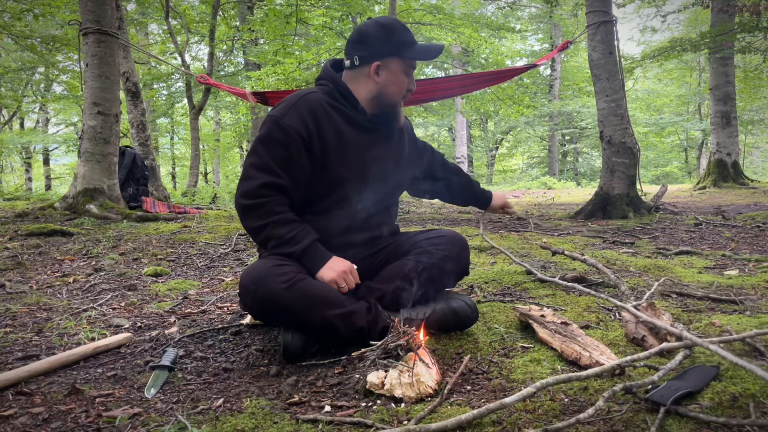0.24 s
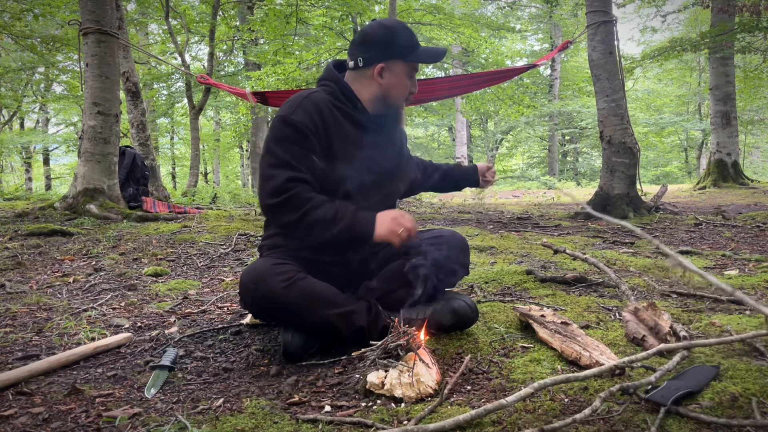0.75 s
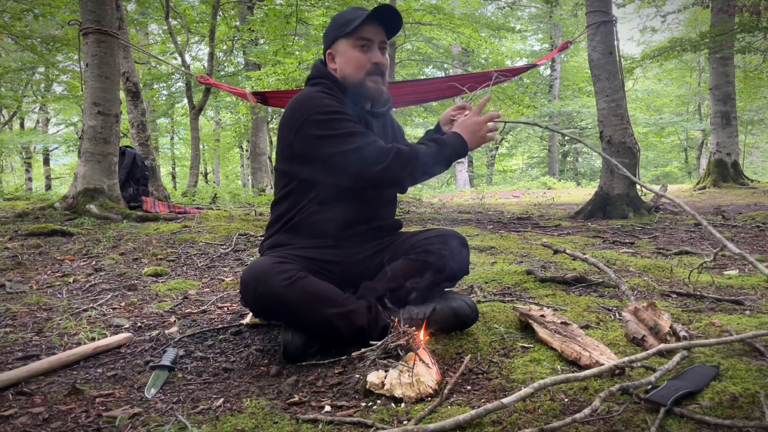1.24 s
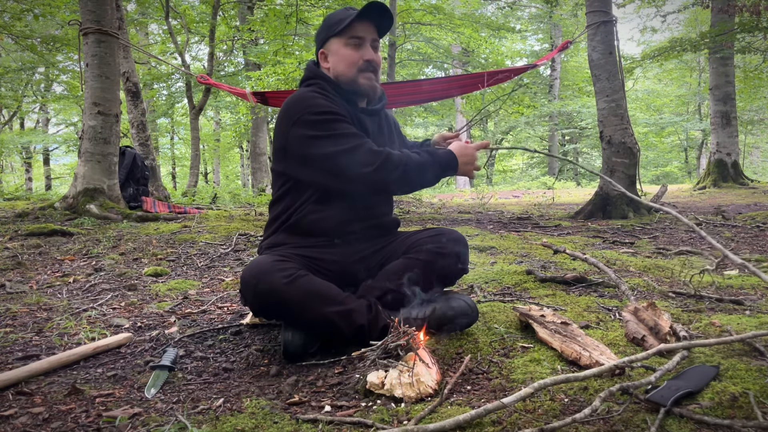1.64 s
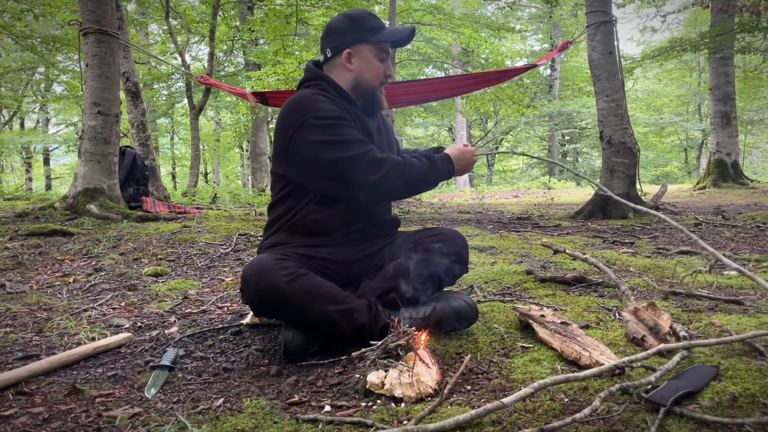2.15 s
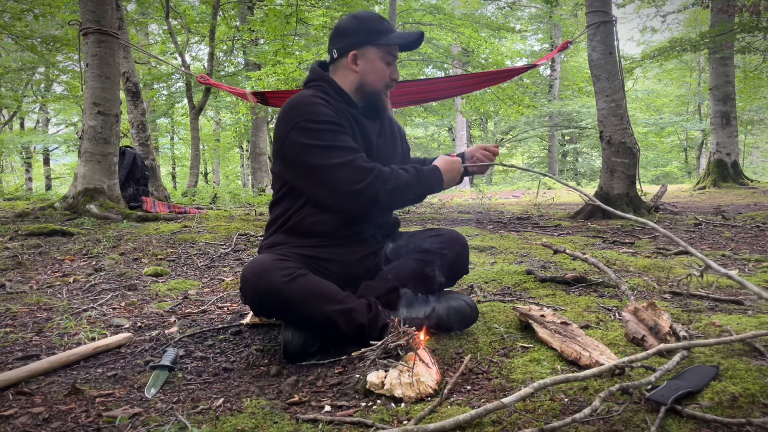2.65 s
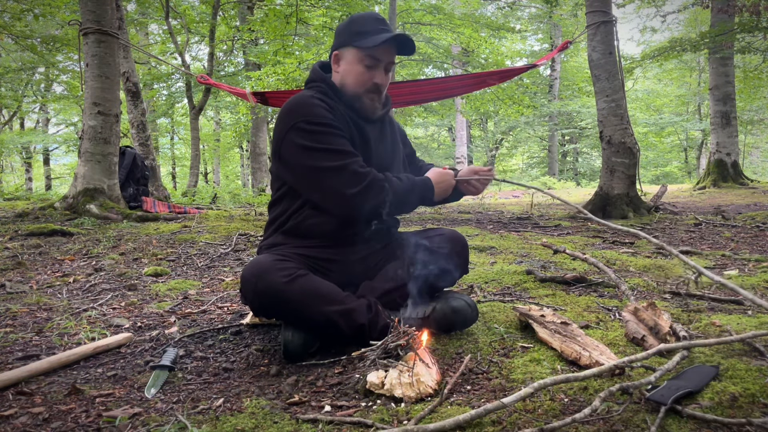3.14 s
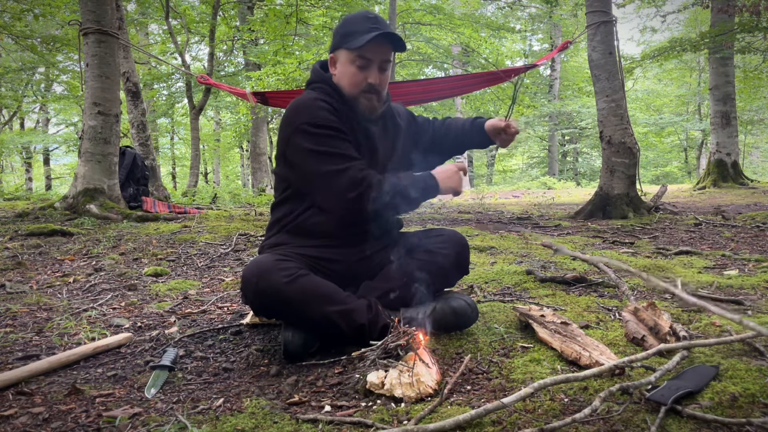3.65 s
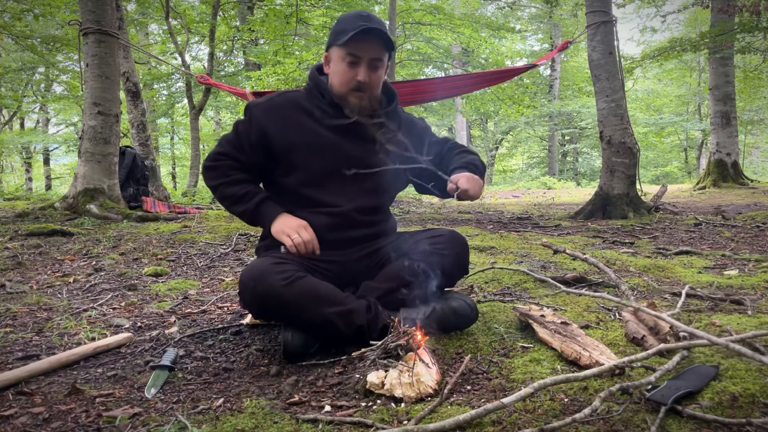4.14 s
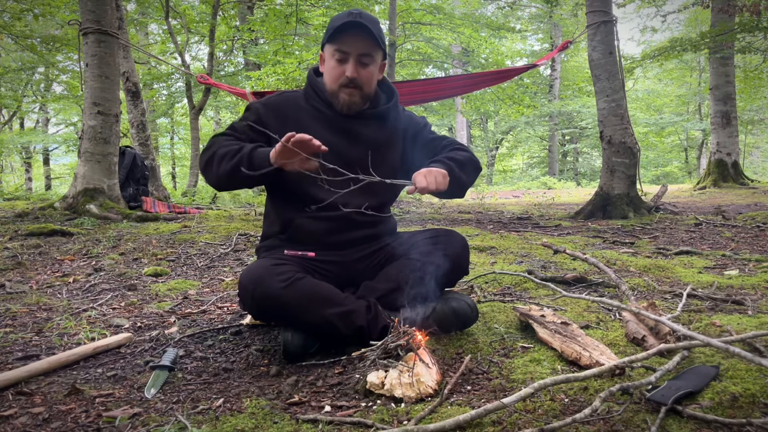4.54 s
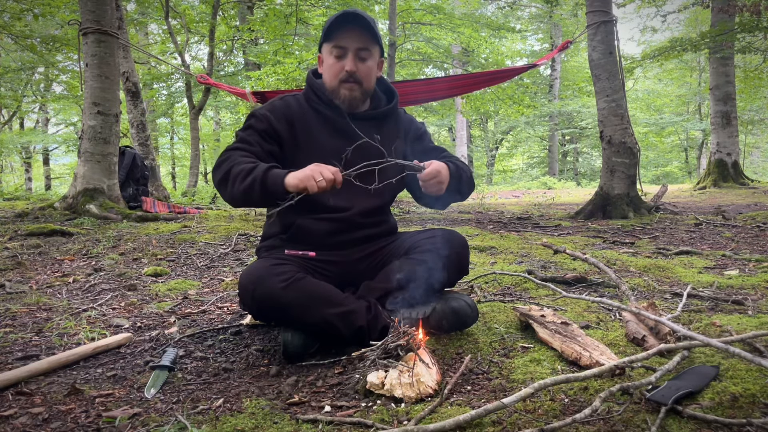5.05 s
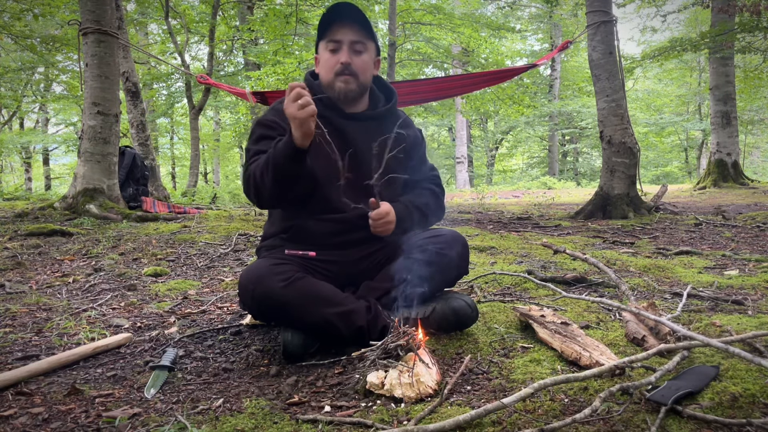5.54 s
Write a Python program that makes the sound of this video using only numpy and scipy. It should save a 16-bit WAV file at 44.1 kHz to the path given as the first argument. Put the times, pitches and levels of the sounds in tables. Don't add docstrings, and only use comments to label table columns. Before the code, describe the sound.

One very loud bright twig crack, then several smaller snaps, dry rustling and scraping between them, over a faint airy woodland hush.

```python
import sys
import numpy as np
from scipy import signal
from scipy.fft import rfft, irfft, next_fast_len
from scipy.io import wavfile
from scipy.ndimage import uniform_filter1d

SR = 44100
rng = np.random.default_rng(int(sys.argv[2]) if len(sys.argv) > 2 else 0)


def persist_wave(psi):
    counts = np.round(np.clip(psi, -1, 1) * 32767).astype(np.int16)
    wavfile.write(sys.argv[1], SR, np.atleast_2d(counts).T)


def linear_from_db(decibels):
    return 10 ** (np.asarray(decibels, float) / 20)


N = 255339
M = next_fast_len(N)
HZ = np.fft.rfftfreq(M, 1 / SR)

# start in seconds, ring peak in dB, ring pitch in Hz, splinter peak in dB, fade in ms.
SNAP_BURSTS = [(.0880, -24, 4300, -17, 1.02), (.0894, -25.5, 6167, -11.5, 1.472),
               (.0907, -18.5, 6153, -8.5, 0.5163), (.0921, -25, 2629, -19, 0.7197),
               (1.4500, -35.5, 3061, -13.5, 1.5985), (1.4511, -29, 6492, -21, 0.8273),
               (1.4522, -29, 2390, -17, 0.6493), (1.4534, -28.5, 2435, -22.5, 1.11),
               (2.2560, -46, 2050, -28, 1.2297), (2.2574, -40.5, 2278, -25, .55),
               (3.1390, -44.5, 2086, -27, 0.9434), (3.1426, -46, 2482, -24.5, 1.3485),
               (3.1441, -41.5, 2095, -19, 0.5432), (3.1468, -36, 2043, -22.5, 0.8944),
               (3.1606, -46.5, 2070, -34, 0.8713), (3.1884, -47, 2198, -36, 1.1476),
               (5.3150, -65.5, 2600, -50, 0.9021), (5.3263, -30, 2460, -18.5, 0.6837),
               (5.3276, -31, 4322, -17.5, 0.501), (5.3296, -34, 4280, -18, .4),
               (5.3307, -34, 2481, -20.5, 0.7145), (5.3340, -36.5, 2375, -27, 1.121)]
# start in seconds, peak in dB, pitch in Hz, t60 in ms.
FREE_RINGS = [(.0885, -17.5, 4347, 8.69), (0.0897, -18, 5561, 8.434), (.0900, -17, 6416, 10),
              (.0908, -17, 7270, 7.53), (.0916, -26, 2618, 21.62), (.0912, -8, 11000, 2.727),
              (.0913, -10, 7700, 2.336), (.0888, -26, 7337, 5.56), (0.091, -15, 14200, 3.5),
              (1.4507, -25.5, 6260, 10.06), (1.4524, -28, 2384, 13.515), (1.4512, -31, 3607, 5.915),
              (1.453, -26, 8300, 5.7), (1.4503, -26, 11000, 8), (1.4524, -22, 11500, 5),
              (1.4582, -40, 6208, 10), (3.1440, -24.5, 7898, 4), (3.1442, -19, 12300, 4),
              (3.1470, -27, 13000, 4), (3.1897, -46.5, 2100, 18.341), (5.0273, -59, 2540, 18.92),
              (5.3264, -25, 2468, 11.914), (5.3268, -27, 6488, 7.55), (5.3263, -25, 13000, 5),
              (5.3300, -29, 2453, 9.7), (5.3305, -32, 4309, 9.67), (5.3348, -34, 2385, 10.496)]
# start in seconds, peak in dB, pitch in Hz, fade in ms.
THICK_END_KNOCKS = [(.09, -49.5, 340.5, 11), (.091, -30, 1700, 2.0), (.584, -48, 800, 3.42),
                    (.392, -54.5, 911.6, 3.954), (.445, -59, 701.3, 6.256), (1.976, -59.5, 260, 9.17),
                    (2.028, -58, 240, 8.97), (2.06, -56.5, 599, 6.844), (2.095, -54.5, 443.8, 9.6),
                    (2.12, -55.5, 698.5, 6.66), (2.138, -54.5, 945.3, 7.79), (2.16, -58.5, 498, 8),
                    (2.345, -57.5, 400, 6.598), (1.452, -51.5, 363.6, 6.956), (1.545, -58, 300.6, 7.313),
                    (2.257, -42.5, 1438, 1.505), (2.265, -40, 1218, 2.622), (2.262, -45, 289.9, 6.85),
                    (3.734, -63, 301.1, 3.6), (5.326, -42, 1240, 5.305), (5.327, -57, 379.6, 8.155)]
# start in seconds, ring peak in dB, ring pitch in Hz.
TWIG_TICKS = [(0.045, -49, 3677), (.3655, -48, 4632), (.399, -45.5, 3977), (.5567, -43, 5230),
              (0.6026, -38, 6590), (0.6169, -40.5, 3694), (0.7783, -53.5, 6814), (.8764, -56.5, 3803),
              (0.8988, -43.5, 4725), (0.9115, -48, 2980), (.9617, -47, 3480), (0.9996, -52, 2318),
              (1.1581, -57, 2730), (1.1824, -51.5, 3127), (1.2132, -59, 4520), (1.4057, -56.5, 4409),
              (1.617, -49, 3100), (1.8, -59.5, 1820), (2.137, -42.5, 3226), (2.3672, -63, 4714),
              (2.5394, -64.5, 4620), (2.9773, -60.5, 1930), (3.2647, -50.5, 5624), (.313, -57, 4610),
              (3.179, -51, 4500), (3.215, -57, 2100), (3.275, -53, 4800), (3.238, -56, 2100),
              (1.128, -58, 4800), (3.3993, -59, 3570), (3.438, -54, 6910), (3.512, -46, 4750),
              (3.5914, -49, 4939), (3.7339, -39, 5900), (3.7781, -44.5, 5050), (3.8367, -53, 4820)]
# start in seconds, ring peak in dB, ring pitch in Hz.
BARK_SCRATCHES = [(.0024, -40.5, 3889), (0.204, -51, 6310), (.229, -48.5, 4838), (0.5159, -52.5, 4776),
                  (0.5849, -50, 2449), (2.0611, -40.5, 3268), (2.1554, -50, 2762), (2.2095, -56, 2569),
                  (2.2265, -55, 6853), (2.2788, -40, 2983), (2.349, -56.5, 4145), (2.9174, -48, 5027),
                  (2.9295, -50, 3431), (3.457, -64, 1787), (3.5656, -42.5, 4945), (3.653, -55.5, 5058),
                  (3.819, -56.5, 4600), (3.9241, -55, 5380), (3.996, -66, 4983), (4.559, -67, 4800),
                  (4.6696, -68, 3400), (4.7042, -63, 5960), (4.82, -64, 3300), (5.0262, -61, 4995),
                  (5.141, -67.5, 2547), (5.2112, -69, 2400), (5.2814, -70.5, 2294), (5.424, -50, 11000),
                  (5.4499, -48, 4890)]
# start in seconds, ring peak in dB, ring pitch in Hz, fade in ms.
BARK_RASPS = [(0.3808, -49, 5120, 4.197), (.392, -51, 2969, 4.225), (.6082, -43, 4830, 3.714),
              (.643, -55, 4997, 4), (.8292, -56, 3850, 5.872), (1.1735, -56, 2993, 5),
              (1.9728, -58, 3289, 5), (1.9925, -58, 3382, 4.5), (2.0145, -52, 3730, 5.087),
              (2.034, -45, 3036, 8.475), (2.0817, -42.5, 3520, 3.055), (2.086, -44, 4500, 5.718),
              (2.104, -49.5, 2808, 6.08), (2.1186, -46.5, 2946, 4.394), (3.4827, -58, 4782, 3.496),
              (3.497, -54, 4900, 7.42), (3.544, -52, 4780, 4.522), (3.586, -51.5, 4900, 5.67),
              (3.66, -57, 5628, 4.933), (3.6795, -55, 6168, 8), (3.72, -54, 6604, 5.106),
              (3.742, -46.5, 2382, 4.17), (3.759, -50, 4500, 3.835), (3.857, -54.5, 5016, 7.7),
              (3.878, -52, 5207, 5), (4.703, -64, 3802, 3.962)]
# start in seconds, peak in dB.
BARK_FLECKS = [(0.391, -49), (0.4104, -54), (0.4653, -53), (0.5344, -53.5), (0.5829, -50), (0.5914, -41.5),
               (0.6098, -48), (0.6263, -47.5), (0.8995, -46.5), (0.9114, -51), (0.9383, -55),
               (0.9627, -55.5), (0.9996, -64), (1.9649, -61), (2.0148, -55.5), (2.1829, -53.5),
               (2.3378, -49), (2.354, -54.5), (2.3674, -63), (2.5094, -67), (2.9184, -46), (2.9291, -45),
               (2.9773, -60), (3.1604, -37), (3.1877, -38), (3.242, -53), (3.4491, -59), (3.4572, -55.5),
               (3.8187, -51.5), (3.8438, -57), (3.925, -54), (3.9364, -62), (4.559, -60), (4.6544, -77),
               (4.6693, -64), (4.7114, -66), (4.7241, -72), (4.8265, -56.5), (5.0227, -58), (5.0347, -52),
               (5.109, -74), (5.1394, -73), (5.2826, -68)]
# frequency in Hz, level in dB.
SPLINTER_COLOUR = [(1000, -34), (3300, -13), (4200, -6), (6400, 0), (9000, -3.5), (12000, -2),
                   (15500, -6.5), (17000, -13)]
# centre in Hz, width in octaves, level in dB, t60 in s.
TRUNK_BANDS = [(400, .4, -2.5, .4), (1118.8, 0.6, 0, 0.46), (2600, 0.16, -3.5, 0.62),
               (2460, 0.37, -5, 0.55), (5450, 0.67, 2.5, 0.54), (9080, 0.3, 1, 0.38), (12500, .25, 1, 0.35)]
# delay in seconds, level in dB.
TRUNK_ECHOES = [(.018, -34), (.026, -30), (.046, -33), (.075, -36), (0.113, -39), (.138, -41),
                (.165, -47.5)]
# hardest moment in seconds, leaf level in dB,
# seconds to swell 20 dB, seconds to die 20 dB, leaf pitch in Hz.
LITTER_STROKES = [(.001, -60, 0.0258, 0.063, 3958), (0.387, -58.5, 0.0066, 0.3478, 4110),
                  (.57, -62.5, 0.2222, 0.1891, 4903), (.605, -52, 0.0596, 0.0995, 4584),
                  (.78, -72.5, 0.3338, 0.4304, 4000), (0.908, -64, 0.5866, 0.1843, 3680),
                  (1.176, -67, -0.0466, 0.1206, 3220), (1.796, -80, 0.1612, 0.0879, 3169),
                  (1.975, -68.5, 0.0416, 0.1977, 3300), (2.04, -59, 0.0654, 0.1966, 3200),
                  (2.087, -54, 0.0851, 0.1476, 3601), (2.139, -54.5, 0.0795, 0.1159, 3386),
                  (2.26, -54, 0.0359, 0.1583, 4631), (2.289, -57, 0.02, 0.0674, 2400),
                  (2.37, -69, 0.5574, 0.2266, 3898), (2.925, -62, 0, 0.1302, 4706),
                  (3.283, -68.5, 0.2147, 0.1587, 3962), (3.574, -68.5, 0.2504, 0.1008, 4857),
                  (3.67, -67.5, 0.0075, 0.313, 4958), (3.733, -55, -0.0021, 0.1154, 4608),
                  (3.51, -65.5, 0.0419, 0.1034, 4909), (3.8, -66, 0.1381, 0.3471, 4500),
                  (3.9, -69, 0.19, 0.2243, 2600), (4.0, -74, .2, .4, 9000), (3.19, -64, .03, .12, 3500),
                  (3.41, -73, .15, .1, 9000), (4.72, -82.5, 0.1793, 0.42, 9015),
                  (4.824, -73, 0, 0.1295, 2766), (5.026, -67, 0.0034, -0.0335, 2563),
                  (5.37, -53, 0.0001, 0.0916, 3220), (5.45, -59, 0.3, 0.04, 3783)]
# time in seconds,
# deep rumble level in dB.
DEEP_RUMBLE = [(0.0, -67), (1.01, -64.5), (1.06, -75), (1.24, -63.5), (1.29, -73.5), (1.48, -60),
               (1.61, -69.5), (2.24, -62), (2.3, -47), (2.35, -62.5), (2.82, -76), (3.19, -64),
               (3.37, -70.5), (3.55, -59.5), (3.69, -67.5), (3.79, -56), (4.0, -74), (5.79, -70)]
# frequency in Hz, level in dB per Hz.
RUMBLE_COLOUR = [(15, -50), (25, -20), (40, -6.5), (54, -1), (71, 2.5), (102, -5.5), (135, 0.5),
                 (149, -0.5), (184, -9.5), (238, -11.5), (365, -24), (420, -25), (550, -53.5), (920, -120)]
# frequency in Hz, level in dB per Hz.
HUSH_COLOUR = [(180, -31.5), (300, -4), (915, -17.5), (1720, -18.5), (2440, -23), (4910, -26.5),
               (7080, -30), (8500, -45.5), (9550, -32), (12500, -32.5), (16000, -44.5)]
# frequency in Hz, left minus right in dB, radians by which left leads
PORT_PAIR = [(30, 1.3, 0, 0, .97), (150, 2.4, 0, 0, .85), (600, .7, .1, .1, .2), (2000, .3, .2, .15, .4),
             (4200, 1.5, .7, .7, .3), (5700, 1.5, -1.2, -1.2, .5), (7300, .2, -2.0, -2.2, .8),
             (7900, .2, -2.7, -3.1, .995), (9100, .2, -3.8, -3.2, .995), (10000, 1.1, -4.6, -5.9, .99),
             (13200, 1.1, -7.5, -6.7, .99), (14600, 1.1, -8.9, -9.4, .95), (17000, 1.1, -10.5, -10.5, .9)]


def on_hz(table, column, hz):
    table = np.array(table)
    return np.interp(np.log(hz + 1), np.log(table[:, 0]), table[:, column])


def columns(table):
    return np.array(table).T[:, :, None]


def shape(x, gain):
    size = 2 * len(gain) - 2
    y = irfft(rfft(x, size) * gain, size)[:len(x)]
    return y / np.sqrt(np.mean(y ** 2))


def hump(hz, octaves, f=HZ):
    return np.exp(-.5 * (np.log2((f + 1) / hz) / octaves) ** 2)


def walk(rate):
    k = int(SR / rate)
    steps = np.repeat(rng.standard_normal(N // k + 1), k)
    return 1.2 * uniform_filter1d(uniform_filter1d(steps, k), k)[:N]


def place(grains, s):
    out = np.zeros(N + grains.shape[1])
    for grain, start in zip(grains, (s * SR).astype(int)):
        out[start:start + len(grain)] += grain
    return out[:N]


def resonance(f, hz, q):
    return 1j * f / hz / (1 - (f / hz) ** 2 + 1j * f / hz / q)


def splinter_response(f, tilt_db, size):
    colour_db = on_hz(SPLINTER_COLOUR, 1, f) + tilt_db * np.log2((f + 1) / 8000)
    cepstrum = irfft(np.log(linear_from_db(colour_db)))
    cepstrum[:, 1:size // 2] *= 2
    cepstrum[:, size // 2 + 1:] = 0
    return np.exp(rfft(cepstrum))


def breaks(s, peak_db, hz, splinter_db, fade_ms, tilt_db, ring_q, tear, spiky_db, thud_db, size=2048):
    ms = np.arange(size) * 1000 / SR
    f = np.fft.rfftfreq(size, 1 / SR)
    fade_ms = np.clip(fade_ms, .1, 8)
    effort = np.minimum(ms / (tear * fade_ms), np.exp(tear - ms / fade_ms))
    chance = rng.standard_normal((len(s), 2, size))
    fibres = rfft(effort * chance[:, 0] * linear_from_db(spiky_db * chance[:, 1]))
    ring = irfft(fibres * resonance(f, hz, ring_q) * 1j * f / (1j * f + 0.4 * hz))
    splinters = irfft(fibres * splinter_response(f, tilt_db + np.zeros_like(s), size))
    thud = irfft(fibres * resonance(f, 540, 0.71) / (1 + 1j * f / 900))
    parts = (ring, peak_db), (splinters, peak_db + splinter_db), (thud, peak_db + thud_db)
    return sum(linear_from_db(db) * g / np.abs(g).max(axis=1, keepdims=True) for g, db in parts)


def snaps():
    s, ring_db, hz, splinter_db, fade_ms = columns(SNAP_BURSTS)
    excess_db = splinter_db - ring_db
    tilt_db = 0.1928 - 0.0743 * excess_db
    return s, breaks(s, ring_db, hz, excess_db, fade_ms, tilt_db,
                     ring_q=8, tear=0.61, spiky_db=2.6, thud_db=-30.5)


def free_rings(size=2048):
    s, peak_db, hz, t60_ms = columns(FREE_RINGS)
    ms = np.arange(size) * 1000 / SR
    fade = linear_from_db(peak_db - 60 * ms / t60_ms) * (1 - np.exp(-ms / 0.22))
    start_phase = 2 * np.pi * rng.random(s.shape)
    return s, 1.4795 * fade * np.sin(2 * np.pi * hz * ms / 1000 + start_phase)


def knocks():
    s, peak_db, hz, fade_ms = columns(THICK_END_KNOCKS)
    return s, breaks(s, peak_db, hz, -41.5, fade_ms, tilt_db=0,
                     ring_q=1.8, tear=0.66, spiky_db=4.4, thud_db=-11)


def ticks():
    s, ring_db, hz = columns(TWIG_TICKS)
    return s, breaks(s, ring_db, hz, splinter_db=-13, fade_ms=3, tilt_db=0,
                     ring_q=4.4, tear=0.31, spiky_db=3.6, thud_db=-19.5)


def scratches():
    s, ring_db, hz = columns(BARK_SCRATCHES)
    return s, breaks(s, ring_db, hz, splinter_db=0, fade_ms=2.7, tilt_db=0,
                     ring_q=5.8, tear=0.32, spiky_db=3.3, thud_db=-20.5)


def rasps():
    s, ring_db, hz, fade_ms = columns(BARK_RASPS)
    return s, breaks(s, ring_db, hz, -7, fade_ms, tilt_db=0,
                     ring_q=4, tear=0.8228, spiky_db=3.5, thud_db=-18)


def flecks():
    s, peak_db = columns(BARK_FLECKS)
    return s, breaks(s, peak_db - 8, 4500, splinter_db=12, fade_ms=1.4325, tilt_db=1.7,
                     ring_q=0.81, tear=0.4, spiky_db=2, thud_db=-18)


def crackle(rate, spread_db, hiss):
    chance = rng.random((N, 2))
    grains = (chance[:, 0] < rate / SR) * linear_from_db(-spread_db * np.log(chance[:, 1] + 1e-9))
    smear = np.exp(-np.arange(200) / 10)
    envelope = signal.fftconvolve(grains, smear)[:N]
    return (envelope / np.sqrt(np.mean(envelope ** 2)) + hiss) * rng.standard_normal(N)


def dragging():
    t = np.arange(N) / SR
    s, top_db, swell_s, die_s, pitch_hz = columns(LITTER_STROKES)
    strokes_db = top_db - 20 * np.maximum((s - t) / np.abs(swell_s), (t - s) / np.abs(die_s))
    leaves_db = strokes_db.max(axis=0)
    hz = pitch_hz[strokes_db.argmax(axis=0), 0]
    harder_db = np.maximum(leaves_db, -90) + 70
    fine_db = -3 - 0.0661 * harder_db
    soil_db = -12 - 0.2776 * harder_db
    push = linear_from_db(leaves_db + 1.5 * walk(50))
    shared = crackle(500, 2.8, .7)

    def band(centre_hz, octaves):
        grains = push * (shared + 0.32 * crackle(280, 2.61, 0.2))
        bell = hump(centre_hz, octaves)
        return irfft(rfft(grains, M) * bell * (HZ < 14400), M)[:N] / np.sqrt(np.mean(bell ** 2))

    centres = 1500 * 2 ** np.arange(0, 2.6, .5)
    near = np.array([0.63 + np.exp(-.5 * (np.log2(hz / c) / 0.44) ** 2) for c in centres])
    near = near / np.sqrt(np.sum(near ** 2, axis=0))
    leaves = sum(w * linear_from_db(2.5 * walk(30)) * band(c, 0.25) for w, c in zip(near, centres))
    soil = band(700, 0.74) + linear_from_db(-3) * band(250, .5)
    return linear_from_db(-8) * leaves + linear_from_db(fine_db - 6) * band(9500, 0.54) + linear_from_db(soil_db - 6.5) * soil


def echoes(twigs, size=12000):
    t = np.arange(size) / SR
    smear_s = .003
    bark = sum(linear_from_db(db) * np.exp(-np.abs(t - s) / smear_s) * (t > s) for s, db in TRUNK_ECHOES)
    rough = bark * rng.standard_normal(size) / np.sqrt(smear_s * SR / 2)
    return signal.fftconvolve(twigs, rough)[:N]


def trunks(grains, s, level_db=-55, gap_s=0.0058, early_db=-43, early_s=.005, size=20480):
    t, f = np.arange(size) / SR, np.fft.rfftfreq(size, 1 / SR)
    coarse = np.fft.rfftfreq(grains.shape[1], 1 / SR)
    share = np.array([hump(hz, 1.4 * octaves, coarse) ** 2 / octaves ** .5
                      for hz, octaves, _, _ in TRUNK_BANDS]).T
    strength = np.sqrt(np.abs(rfft(grains)) ** 2 @ share * 2 / grains.shape[1])
    plateau = linear_from_db(level_db) * (1 - np.exp(-t / gap_s))
    rise = plateau + linear_from_db(early_db) * np.exp(-t / early_s) * (t > .004)
    decay = np.array([linear_from_db(db - 60 * t / t60) * rise for _, _, db, t60 in TRUNK_BANDS])
    scatter = np.array([shape(rng.standard_normal(size), hump(hz, octaves, f) * (f < 14500))
                        for hz, octaves, _, _ in TRUNK_BANDS])
    turns = rng.integers(0, size, len(s))
    tails = [g @ (decay * np.roll(scatter, k, axis=1)) for g, k in zip(strength, turns)]
    return place(np.array(tails), s)


def wind():
    s, gust_db = np.transpose(DEEP_RUMBLE)
    deep_db = np.interp(np.arange(N) / SR, s, gust_db)
    upper_db = deep_db - .5 - 0.3307 * (deep_db + 68)
    colour = linear_from_db(on_hz(RUMBLE_COLOUR, 1, HZ)) * (HZ < 900)
    upper = 1 / (1 + (110 / (HZ + 1)) ** 4)
    noise = rng.standard_normal(N)
    deep_rumble = linear_from_db(deep_db + 1.7 * walk(12)) * shape(noise, colour * (1 - upper))
    return deep_rumble + linear_from_db(upper_db + 1.8 * walk(17)) * shape(noise, colour * upper)


def canopy():
    hush = shape(rng.standard_normal(N), linear_from_db(on_hz(HUSH_COLOUR, 1, HZ)))
    singing = linear_from_db(-13 + 3 * walk(4.3)) * shape(rng.standard_normal(N), hump(1900, 0.16))
    return linear_from_db(-81.5 + 1.5031 + 0.9 * walk(7.6)) * (hush + singing)


def ports(x, other, alike, axis):
    turn = np.exp(.5j * on_hz(PORT_PAIR, axis, HZ)) * linear_from_db(on_hz(PORT_PAIR, 1, HZ) / 2)
    same = np.sqrt((1 + alike) / 2) * rfft(x, M)
    differ = np.sqrt((1 - alike) / 2) * rfft(other, M)
    return irfft(np.array([(same + differ) * turn, (same - differ) / turn]), M)[:, :N]


def scene():
    sources = [snaps(), free_rings(), knocks(), ticks(), scratches(), rasps(), flecks()]
    s = np.vstack([start for start, _ in sources])[:, 0]
    grains = np.vstack([grain for _, grain in sources])
    twigs = place(grains, s)
    alike = np.clip(on_hz(PORT_PAIR, 4, HZ), 0, 1)
    hands = ports(twigs, np.roll(twigs, 31), 0.8963, axis=2)
    litter = ports(dragging(), dragging(), np.clip(alike + 0.07, 0, .995), axis=3)
    far = [trunks(grains, s) + echoes(twigs) + wind() + canopy() for _ in range(2)]
    return hands + litter + ports(*far, alike, axis=3)


def band_limit(x):
    return signal.sosfilt(signal.butter(12, 17020, fs=SR, output="sos"), x)


def record(dry):
    bass_cut = signal.butter(2, 45, "high", fs=SR, output="sos")
    top_cut = signal.ellip(8, .3, 70, 16100, fs=SR, output="sos")
    mix = np.tanh(signal.sosfilt(np.vstack([bass_cut, top_cut]), dry))
    return band_limit(mix)


dry = scene()
out = record(dry)
persist_wave(out)
```